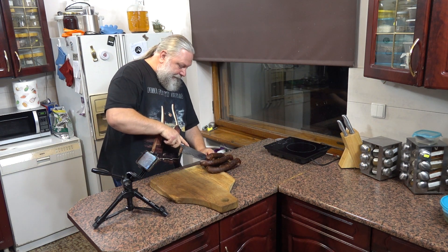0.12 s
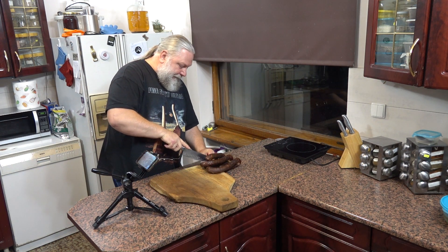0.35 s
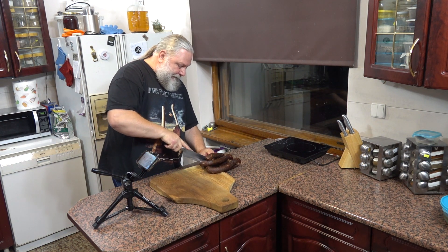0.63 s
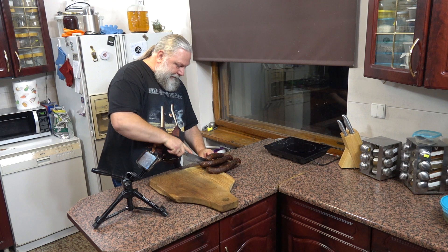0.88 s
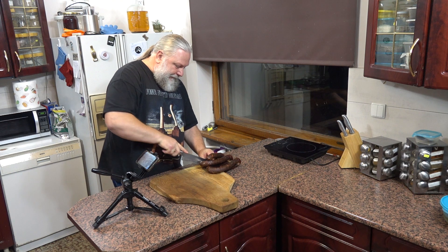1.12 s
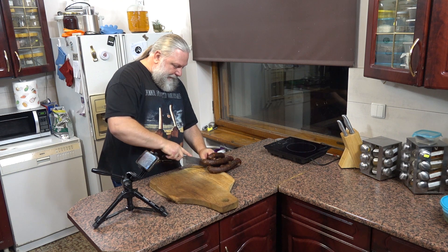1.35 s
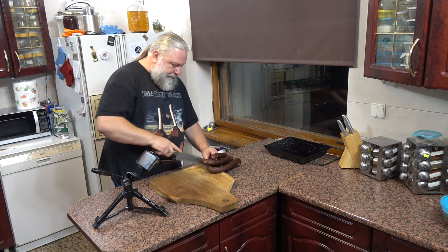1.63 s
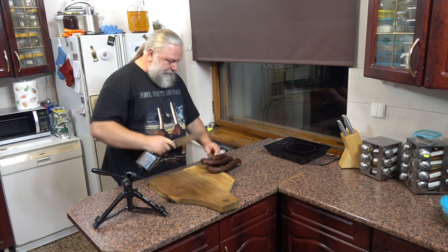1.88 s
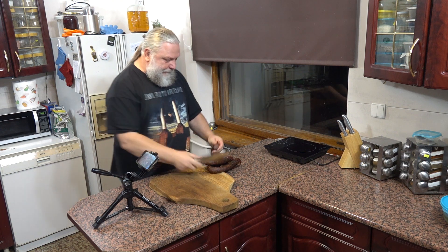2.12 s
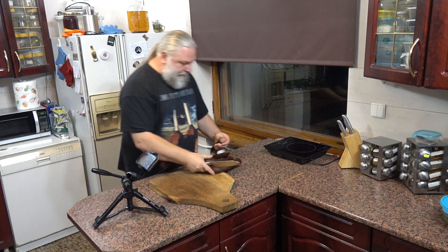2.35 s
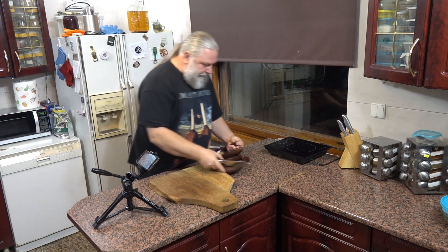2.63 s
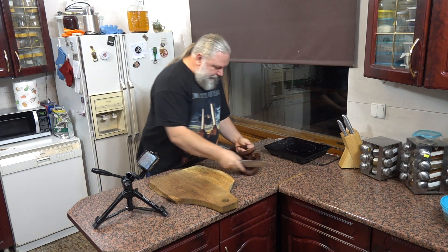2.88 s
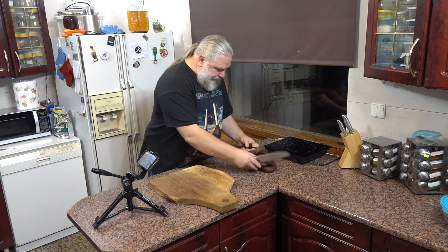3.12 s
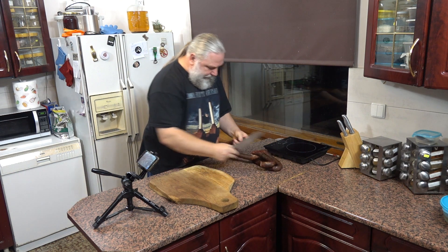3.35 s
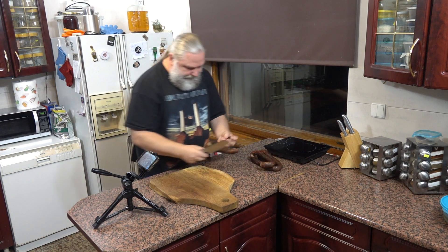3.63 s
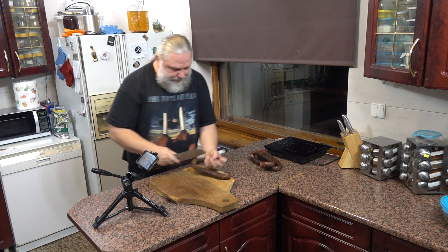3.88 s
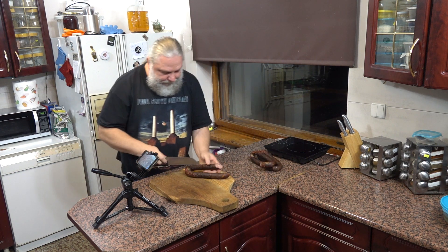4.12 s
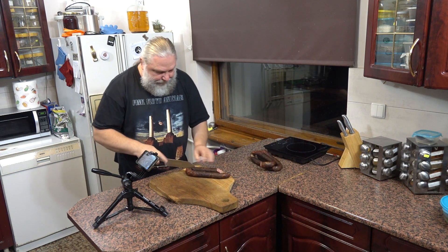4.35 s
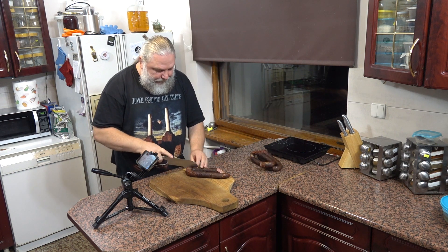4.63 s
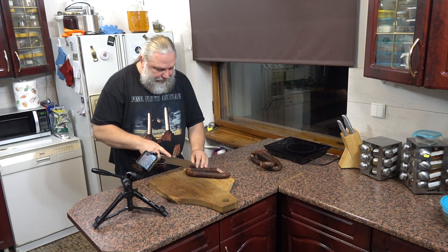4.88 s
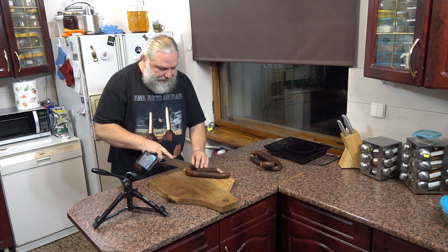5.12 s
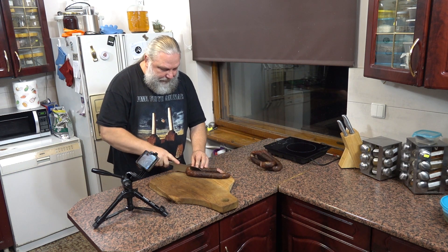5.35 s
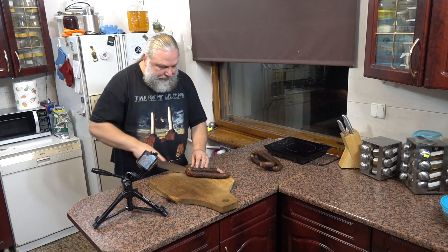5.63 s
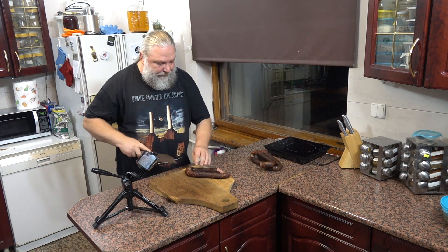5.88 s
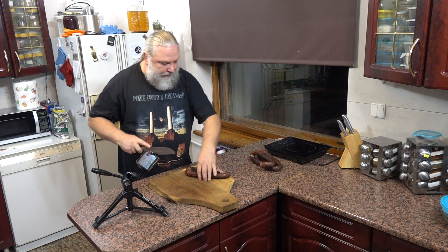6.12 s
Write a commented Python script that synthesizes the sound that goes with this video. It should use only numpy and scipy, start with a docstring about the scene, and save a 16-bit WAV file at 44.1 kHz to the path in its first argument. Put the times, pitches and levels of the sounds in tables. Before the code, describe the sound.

Two loud woody chops, handling bumps and a brief blade ring, then firm thumps of sausage set down and short sawing scrapes in a hard kitchen.

```python
"""Knife cutting dry sausage

A heavy knife works on a kitchen counter, with two microphones standing on it. Blows are bursts of noise in
the air (crack, edge, tick) and thumps in the worktop, made of fading sine waves. Between them blade, fingers
and sausage skin scrape and rustle as grains of noise, sometimes squeaking; once the steel blade rings.
A hard-walled kitchen answers with a noise tail, over a faint hiss, a thin high tone and a slow wobble.
Now and then everything fades briefly and snaps back with the next blow."""
import sys
import numpy as np
from scipy import signal
from scipy.fft import rfft, irfft, next_fast_len
from scipy.io import wavfile
from scipy.ndimage import uniform_filter1d

SR = 44100
rng = np.random.default_rng(int(sys.argv[2]) if len(sys.argv) > 2 else 0)


def to_wav(s):
    """Save 16-bit WAV."""
    ch = np.atleast_2d(s).T  # columns
    pcm = np.round(np.clip(ch, -1, 1) * 32767)  # PCM
    wavfile.write(sys.argv[1], SR, pcm.astype(np.int16))


def gain_from_db(level_db):
    """Turn a decibel level (scalar or array-like) into a linear amplitude factor."""
    decades = np.asarray(level_db, float) / 20
    return 10 ** decades


N = 275177
T = np.arange(N) / SR
FAST = next_fast_len(N)
F = np.fft.rfftfreq(FAST, 1 / SR) + 1  # in Hz; the 1 keeps its logarithm finite

# ways in which the worktop rings: f/Hz, relative level/dB, time to fade by 60 dB/s
WORKTOP = [(79.5, 2, 0.47), (103.4, 7, 0.14), (129.24, 2, 0.26), (150.3, -0.5, 0.085), (214.5, 3, 0.18),
           (241.3, -0.5, 0.2663), (288.3, 1.5, 0.33), (323, -14.5, 0.073), (374, -7, 0.061)]
# group of each of these modes: 0 main, 1 deep, 2 middle, 3 upper
GROUP = np.array([1, 1, 0, 0, 2, 2, 3, 3, 3])
# blows felt through the worktop: t/s, relative level/dB,
# then how much the place struck favours the deep, middle and upper modes: three levels/dB
THUMPS = [(0.138, -53.5, 8.5, -9, -21.5), (0.412, -37, -12, -7.5, -14), (0.577, -24, -1.5, 3, 4),
          (0.964, -23, -2, 3, 4.5), (1.311, -34, 1, 1, -24), (1.347, -30, 0, 1, -19),
          (1.366, -26, -28, 2, 0), (2.303, -34.5, -5, -6, -10), (2.53, -25.5, -14, -12, -11),
          (2.625, -19.5, -24.5, -10.5, -22.5), (2.716, -21, 2, 3.5, -5), (3.857, -13, -11.5, -1, -3),
          (4.005, -20.5, -7.5, -23, -21), (4.227, -6.5, -10.5, -8, -14), (4.576, -46.5, -1.5, -6, -12),
          (5.242, -28.5, -10, 0, -0.5), (5.286, -28.5, 4, 4.5, -2), (5.433, -22.5, -39, 0, -3.5),
          (5.483, -26.5, -14, -2.5, 0.5), (6.101, -19, -3, -13, -27)]
SWELL_EDGE = 0.78  # shape of rubbing swells and squeaks; under 1: flat top, steep ends


def curve(rows, column=1):
    """One column of a table as a value per sample; silent outside the table."""
    rows = np.array(rows, float)
    return np.interp(T, rows[:, 0], rows[:, column], left=-150, right=-150)


def causal(x, db):
    """Filter by a dB value per frequency; nothing rings before its cause (folded cepstrum)."""
    cepstrum = irfft(np.log(gain_from_db(db)), FAST)
    cepstrum[1:FAST // 2] *= 2
    cepstrum[FAST // 2:] = 0
    response = np.exp(rfft(cepstrum))
    return irfft(rfft(x, FAST) * response, FAST)[..., :N]


def colour(x, points):
    """Filter by (f/Hz, level/dB) points."""
    hz, db = np.transpose(points)
    return causal(x, np.interp(np.log(F), np.log(hz), db))


def unit(x):
    """Scale to rms 1."""
    return x / np.sqrt(np.mean(x ** 2))


def flicker(rate, db):
    """Gain that wanders between random levels, rate of them a second; db sets how far."""
    k = int(SR / min(rate, 300))
    levels = rng.standard_normal(size=2000)
    return gain_from_db(db * uniform_filter1d(levels[np.arange(N) // k], k))


def air():
    """Room tone: noise alike left and right in the bass, unrelated above."""
    # colour of the room tone: f/Hz, level/dB
    air_points = [(14, -23), (35, 5.5), (200, -7), (330, -13.5), (500, -22), (900, -22.5), (1800, -17.5),
                  (3100, -22), (6000, -27.5), (9500, -27.5), (11000, -36), (15500, -35.5), (16000, -83.5)]
    mid, side = rng.standard_normal((2, N))
    side = colour(side, [(100, -21.0), (250, -4), (500, 0.5)])
    stereo = mid + side * np.array([[1], [-1]])
    return gain_from_db(-64.5) * unit(colour(stereo, air_points)) * flicker(17, 2.2)


def whistle():
    """A faint, slightly wavering high tone: noise squeezed into a very narrow band."""
    # loudness of the tone: t/s, level/dB
    whistle_levels = [(4.1, -80), (5.1, -79.5), (5.3, -58.5), (5.4, -95)]
    hz = 9449
    band = [(hz - 60, -40), (hz, 0), (hz + 60, -40)]
    return gain_from_db(curve(whistle_levels)) * unit(colour(rng.standard_normal((2, N)), band))


def sway():
    """Slow wobble of the stand: every deep thump sets it off, then it settles."""
    # colour of the wobble: f/Hz, level/dB
    sway_band = [(16, -34), (35, 0), (48, -8), (90, -110)]
    rest_db, rise_s, t60_s = -66.5, 0.023, 1.2
    sway_db, share = -44.5, 0.71  # after a deep thump of -30 dB; dB more per dB of thump
    power = gain_from_db(2 * rest_db)
    for s, db, deep_db, *_ in THUMPS:
        start_db = sway_db + share * (db + deep_db + 30)
        power = power + (T > s) * gain_from_db(2 * (start_db - 60 * np.abs(T - s) / t60_s))
    gain = uniform_filter1d(np.sqrt(power), int(rise_s * SR))
    return gain * unit(colour(rng.standard_normal(N), sway_band))


def dips():
    """Overall gain with its brief fades, each snapping back with the next blow."""
    # fades: start t/s, fade length/s, start of the return t/s, level/dB
    dip_rows = [(.325, 0.0091, 0.41, -12), (.52, 0.05, .572, -5.5), (.88, .04, .958, -6),
                (1.58, 0.075, 1.666, -11)]
    back_s = 0.014  # how long the return takes
    return gain_from_db(sum(np.interp(T, [s, s + fade, back, back + back_s], [0, db, db, 0])
                   for s, fade, back, db in dip_rows))


def kitchen(x):
    """Echoes off hard walls: a dense noise tail, unlike at each microphone, fading at its own pace per octave."""
    # how long the room rings: f/Hz, time to fade by 60 dB/s
    kitchen_t60 = [(300, 0.39), (1000, 0.49), (2500, 0.54), (6000, 0.78), (12000, 0.28)]
    t, tail = T[:SR * 3 // 4], 0
    hz, t60 = np.transpose(kitchen_t60)
    for mid in 125 * 2. ** np.arange(8):  # one octave at a time, in Hz
        edges = [mid / np.sqrt(2), min(mid * np.sqrt(2), .45 * SR)]
        sos = signal.butter(2, edges, "band", fs=SR, output="sos")
        fade = np.exp(-np.log(1000) * t / np.interp(np.log(mid), np.log(hz), t60))
        tail = tail + signal.sosfilt(sos, rng.standard_normal((2, len(t)))) * fade
    energy = np.sum(tail ** 2, axis=1, keepdims=True)
    tail = tail * np.clip(t / 0.0054, 0, 1) / np.sqrt(energy)
    return signal.fftconvolve(x, tail, axes=1)[:, :N]


def blade():
    """The steel is tapped once and rings unevenly, louder on the left; the short contact leaves out the bass."""
    # ways in which the steel rings: f/Hz, relative level/dB, time to fade by 60 dB/s
    blade_modes = [(850, -17.5, 0.21), (1336, -13.5, 0.17), (1905, -5.5, 0.11), (2930, -5, 0.13),
                   (3440, -23, 0.1), (3700, -14.5, 0.39), (3760, -7.5, 0.19), (4125, -14, 0.42),
                   (4750, 0, 0.035), (5580, -12.5, 0.41), (6130, -11, 0.18), (6490, -1.5, 0.21),
                   (7410, 1, 0.43), (7600, 4, 0.1), (8349, -2, 0.1), (9000, 0, 0.049), (9500, -15, 0.14),
                   (10510, -21, 0.29), (11700, -17, 0.18), (13100, -31, 0.22)]
    start_s, level_db, pan_db = 1.679, -36.5, 9.5
    choke = 1.51  # over 1: the hand chokes the ringing more and more
    waver_db = 2.5  # each mode's level wanders at random as it fades
    t = np.clip(T - start_s, 0, None)
    steel = 0
    for hz, db, t60 in blade_modes:
        fade = gain_from_db(level_db + db - 60 * (t / t60) ** choke)
        steel = steel + fade * np.sin(2 * np.pi * hz * t) * flicker(45.15, waver_db)
    steel = colour(steel * np.clip(t / .0006, 0, 1), [(200, -52), (400, -8), (14500, -1)])
    # the sound reaches the right microphone 9 samples later
    return np.array([gain_from_db(pan_db / 2) * steel, gain_from_db(-pan_db / 2) * np.roll(steel, 9)])


def squeaks():
    """The rubbing catches on one resonance: a narrow, trembling tone climbs, unlike at each microphone."""
    # squeaks: start t/s, length/s, f/Hz, level/dB
    squeak_rows = [(2.589, 0.038, 2087, -30.5), (2.645, 0.032, 1796, -29.5), (4.426, 0.36, 2350, -71),
                   (5.283, 0.087, 1750, -40.5), (5.555, 0.13, 638, -46), (5.575, 0.075, 2200, -41),
                   (5.665, 0.08, 2400, -42)]
    width_hz, climb = 340, .04  # climb: share by which the pitch rises
    out, k = np.zeros((2, N)), int(SR / width_hz)
    # two slow random signals make the tone tremble
    a, b = (unit(uniform_filter1d(uniform_filter1d(rng.standard_normal((2, N)), k), k)) for _ in range(2))
    for s, length, hz, db in squeak_rows:
        u = np.clip((T - s) / length, 0, 1)
        phase = 2 * np.pi * hz * length * (u + climb * (u ** 2 - u) / 2)
        swell = np.abs(np.sin(np.pi * u)) ** SWELL_EDGE * (u < 1)
        out += gain_from_db(db) * swell * (a * np.sin(phase) + b * np.cos(phase))
    return out


def contact():
    """How loud the rumble, rasp and hiss of rubbing are: long slides plus short swells of one shape."""
    # two long slides of board and blade: t/s, rumble in the worktop level/dB, rasp level/dB, hiss level/dB
    slides = [
        [(2.36, -64, -63, -78), (2.42, -45.5, -41.5, -63), (2.5, -42, -39.5, -57), (2.57, -31.5, -34, -52),
         (2.588, -29, -32, -28), (2.61, -43, -31.5, -40.5), (2.64, -30.5, -31.5, -39), (2.67, -26, -31, -45.5),
         (2.71, -43, -50, -52)],
        [(5.4, -57, -53, -62), (5.47, -34, -42, -47), (5.57, -43.5, -39, -40), (5.64, -40, -39.5, -45),
         (5.69, -42, -40.5, -49), (5.73, -30.5, -51, -46.5), (5.757, -54, -98, -58)],
    ]
    # short swells of rubbing; the one at 0.646 s is the lingering tail of a blow:
    # start t/s, length/s, then rumble, rasp and hiss level/dB
    swells = [(0.157, 0.2, -65, -66.5, -69), (0.435, 0.065, -71.5, -63, -59.5),
              (0.646, 0.25, -56, -48, -71), (1.173, 0.15, -43, -52, -55.5), (1.285, 0.05, -32, -74, -57),
              (1.392, 0.093, -39, -56.5, -62.5), (1.482, 0.074, -41.5, -48.5, -53.5),
              (1.905, 0.21, -70, -62, -60), (2.229, 0.16, -48.5, -55, -61.5), (2.73, 0.12, -37.5, -69, -67),
              (3.102, 0.26, -82, -83.5, -59.5), (3.944, 0.12, -34, -56.5, -64.5),
              (4.03, 0.13, -49, -46, -52.5), (4.158, 0.083, -34.5, -46, -53),
              (5.051, 0.081, -44.5, -61, -56.5), (5.111, 0.14, -43, -51, -52),
              (5.248, 0.14, -35, -42.5, -51), (6.126, 0.13, -46, -57, -67.5)]
    skew = 0.92  # under 1: a swell peaks early
    gains = np.array([sum(gain_from_db(curve(rows, column=c)) for rows in slides) for c in (1, 2, 3)])
    for s, length, *db in swells:
        u = np.clip((T - s) / length, 0, 1)
        shape = np.abs(np.sin(np.pi * u ** skew)) ** SWELL_EDGE * (u < 1)
        gains += gain_from_db(np.array(db))[:, None] * shape
    return uniform_filter1d(gains, size=200)


def nearby(size):
    """Grains smeared over a ms or two by worktop, board and hands; half alike, a little late, at the right."""
    smear = np.exp(-T[:SR // 100] / .0015)
    noise = rng.standard_normal((2, N))
    noise[1] = (noise[1] + np.roll(noise[0], 25)) / np.sqrt(2)  # 25 samples late
    return noise * np.sqrt(np.convolve(size ** 2, smear)[:N])


def board(x):
    """The wooden board lifts its own narrow resonances."""
    # resonances of the board: f/Hz
    board_hz = [853, 1096, 1300, 1743, 2204, 2624]
    lift_db, width_hz = 3.5, 70
    lift = sum(1 / (1 + ((F - hz) * 2 / width_hz) ** 2) for hz in board_hz)
    return causal(x, lift_db * lift)


def patchy(x, points, rate, patchy_db, octaves, count):
    """Coloured noise whose narrow bands swell and fade alone, as a moving contact wakes other resonances."""
    spectrum = rfft(colour(x, points), FAST)
    out, step = 0, count * np.log2(F)  # count bands an octave
    for band in range(count * octaves[0], count * octaves[1] + 1):
        share = np.clip(1 - np.abs(step - band), 0, 1)
        out = out + irfft(spectrum * share, FAST)[..., :N] * flicker(rate, patchy_db)
    return unit(out)


def ring(force, modes):
    """Damped modes (fading sine waves) driven by a force."""
    t = T[:SR]
    body = sum(gain_from_db(db) * np.exp(-np.log(1000) * t / t60) * np.sin(2 * np.pi * hz * t)
               for hz, db, t60 in modes)
    return signal.fftconvolve(force, body)[:N]


def rubbing(rumble, rasp, hiss):
    """Uneven stick-slip grains rasp in the board and hiss off the skin; uneven noise shakes the worktop."""
    # colour of the rasp: f/Hz, level/dB
    rasp_points = [(240, -29), (620, -14), (900, -3), (1400, -5), (2000, -1), (2700, -1), (3900, -13.5),
                   (5000, -13), (6200, -18.5), (9000, -48.5)]
    # colour of the hiss: f/Hz, level/dB
    hiss_points = [(4000, -27.5), (6000, -8), (6800, -10), (8100, -2), (9700, -8.5), (11300, -17),
                   (14700, -22.5), (15700, -39)]
    # how rubbing weighs the main, deep, middle and upper worktop modes: level/dB
    favour_db = [8, -15, -5.5, -8]
    # many small slips, few big ones
    slips, grain = gain_from_db(4.3 * np.minimum(rng.exponential(size=(2, N)), 6.5))
    slips = nearby(slips * flicker(70, 2.0))
    grain = nearby(grain * flicker(90, 1.8))
    push = rng.standard_normal(N) * flicker(35, 2.8)
    # octaves are band edges as powers of two in Hz
    rasping = rasp * patchy(board(slips), rasp_points, 14, 3.2, octaves=(8, 13), count=8)
    hissing = hiss * patchy(grain, hiss_points, 14, 4.2, octaves=(12, 14), count=16)
    modes = [(hz, db + favour_db[group], t60) for (hz, db, t60), group in zip(WORKTOP, GROUP)]
    return rumble * unit(ring(push, modes)), rasping + hissing


def bumps():
    """Dull bumps of hand and sausage: each is a single soft swing of the worktop that hardly rings."""
    # bumps: t/s, level/dB, f/Hz
    bump_rows = [(1.112, -23, 190), (1.206, -28, 172), (1.275, -29.5, 180), (2.253, -42, 224)]
    cycles = .4  # half-length of the swing
    return sum(gain_from_db(db) * np.exp(-((T - s) * hz / cycles) ** 2) * np.cos(2 * np.pi * hz * (T - s))
               for s, db, hz in bump_rows)


def thumps():
    """A blow rings the worktop; every place struck weighs and tunes the modes its own way."""
    ragged_db, ragged_s = 7, 0.0176  # loose things on the slab make middle and upper modes ring unevenly
    spread_s, soft_share = 0.0053, 0.21  # rise of a hard thump; dB longer per dB that the upper modes lack
    first_wave_db, first_wave_s = 3, 0.01  # the first swing stands above the ringing
    out, t = np.zeros(N + SR), T[:SR // 2]
    hz, mode_db, t60 = np.transpose(WORKTOP)[:, :, None]
    chance = rng.standard_normal((len(THUMPS), 2, len(WORKTOP), 1))
    knots = rng.standard_normal((len(THUMPS), len(WORKTOP), 64))
    for (s, db, *favour_db), (detune, scatter), knot in zip(THUMPS, chance, knots):
        gain = gain_from_db(db + mode_db + np.array([0, *favour_db])[GROUP, None] + 1.6 * scatter)
        ragged = np.array([np.interp(t / ragged_s, range(64), k) for k in knot]) * (GROUP[:, None] > 1)
        gain = gain * gain_from_db(-ragged_db * np.abs(ragged) * np.clip(t / ragged_s - .5, 0, 1))
        swing = np.sin(2 * np.pi * hz * (1 + 0.022 * detune) * t)
        modes = gain * np.exp(-np.log(1000) * t / t60) * swing
        # the wave needs a few ms to spread through the slab, longer after a soft, dull blow
        spread = np.clip(t / spread_s * gain_from_db(soft_share * favour_db[2]), 0, 1)
        rise = np.sin(np.pi / 2 * spread) ** 2
        first_wave = (1 + gain_from_db(first_wave_db) * np.exp(-t / first_wave_s)) / 2
        out[int(s * SR):][:len(t)] -= modes.sum(axis=0) * rise * first_wave
    return out[:N]


def cracks():
    """Each blow is a woody crack, a brighter edge and a tiny tick of noise, unlike at the two microphones."""
    # blows heard through the air: t/s, crack level/dB, edge level/dB, tick level/dB
    crack_rows = [(0.414, -34.5, -61, -61), (0.585, -1, -10.5, -16.5), (0.97, -1.5, -10.5, -19.5),
                  (1.202, -23.5, -39, -44), (1.25, -42, -25.5, -18), (1.27, -30, -25.5, -16),
                  (1.368, -11, -33.5, -47), (1.678, -39, -29, -24.5), (2.305, -33, -36, -43),
                  (2.509, -26, -27, -42), (2.716, -17.5, -32, -27.5), (3.858, -3.5, -29.5, -34),
                  (4.165, -67.5, -29, -30), (4.227, -45, -26, -29), (4.236, -5.5, -39, -37),
                  (4.574, -49, -37.5, -42.5), (4.853, -68, -49, -34), (5.059, -68, -43, -25.5),
                  (5.071, -51, -46, -27.5), (5.241, -11.5, -21, -30), (5.437, -11.5, -26, -27.5),
                  (5.635, -40, -26, -37.5), (5.722, -32, -36, -39), (6.032, -61.5, -43, -39.5)]
    # colour of the crack: f/Hz, level/dB
    wood_points = [(240, -13), (420, -6), (760, -1), (1100, -1), (1770, -0.5), (2600, -9.5), (3600, -27.5),
                   (6000, -50)]
    # colour of the edge: f/Hz, level/dB
    edge_points = [(1200, -39.5), (2400, -2.5), (3300, -1.5), (5500, -13), (7500, -21), (11000, -47)]
    # colour of the tick: f/Hz, level/dB
    tick_points = [(4500, -18.5), (7000, -2.5), (9500, -3), (12500, -28.5), (15700, -41.5)]
    lead = .012  # longest wait, s
    lead_db = -19.5  # where the blade lands just after the worktop is pushed, a dull crunch fills the wait
    t = T[:SR // 16] - lead
    noise = rng.standard_normal((len(crack_rows), 3, 2, len(t)))
    burst = np.exp(-np.abs(t) / np.array([[.006], [.004], [.002]]))  # s, for crack, edge and tick
    parts = np.zeros((3, 2, N + SR))
    for (s, *db), grain in zip(crack_rows, noise):
        wait = min([s - row[0] for row in THUMPS if 0 < s - row[0] < lead], default=0)
        rise = np.clip(t / 0.0016, gain_from_db(lead_db), 1) * (t > -wait)
        shape = gain_from_db(np.array(db))[:, None] * burst * rise
        parts[..., int((s - lead) * SR):][..., :len(t)] += shape[:, None] * grain
    wood, edge, tick = parts[..., :N]
    return colour(board(wood), wood_points) + colour(edge, edge_points), colour(tick, tick_points)


def scene():
    """The worktop reaches both microphones alike; each sound sends its own share into the room, the crack the
    most."""
    # left minus right microphone: f/Hz, level/dB
    ears = [(1400, -1.5), (2800, -0.5), (5600, 2.5), (14000, -2)]
    # long waves reach both microphones more alike, so less room difference there: f/Hz, level/dB
    room_side = [(100, -9.5), (250, -5.5), (500, 0.5)]
    crack, tick = cracks()
    rumble, scrape = rubbing(*contact())
    solid = thumps() + bumps() + rumble
    steel = blade()
    scrape = scrape + squeaks()
    room = kitchen(gain_from_db(-6.0) * solid + gain_from_db(-3.0) * crack + gain_from_db(-8.0) * tick
                   + gain_from_db(-13.0) * scrape + gain_from_db(-18) * steel)
    side = colour(room[0] - room[1], room_side)
    room = (room.sum(axis=0) + side * np.array([[1], [-1]])) / 2
    airborne = crack + tick + scrape + steel + room
    left, right = ([(hz, sign * db / 2) for hz, db in ears] for sign in (1, -1))
    airborne = np.array([colour(airborne[0], left), colour(airborne[1], right)])
    return (solid + sway() + airborne + whistle() + air()) * dips()


def band_limit(x):
    """A steep low-pass at the top of the band."""
    return signal.sosfilt(signal.butter(12, 15940, fs=SR, output="sos"), x)


def record(dry):
    """Turns the finished mix into the sound that is written out."""
    return band_limit(dry)


dry = scene()
out = record(dry)
to_wav(out)
```